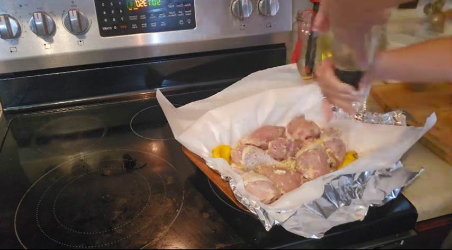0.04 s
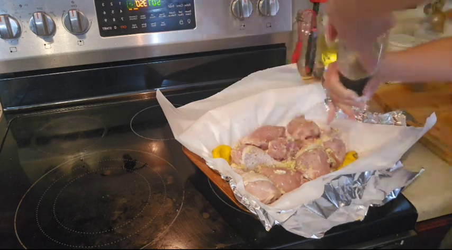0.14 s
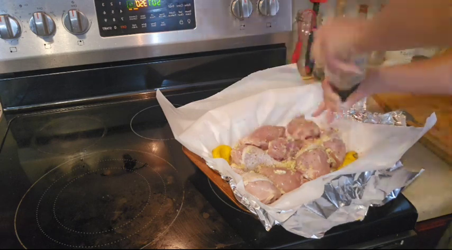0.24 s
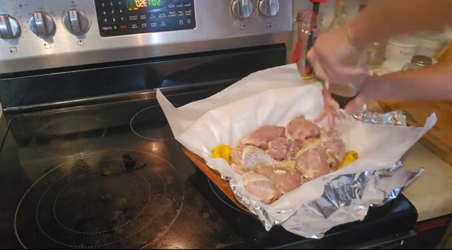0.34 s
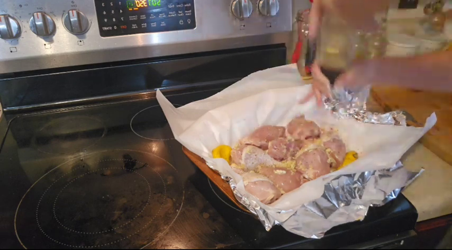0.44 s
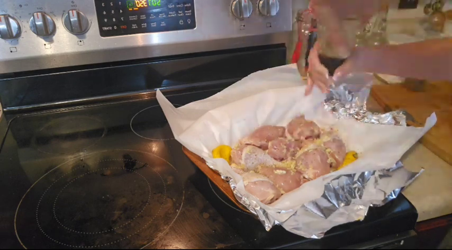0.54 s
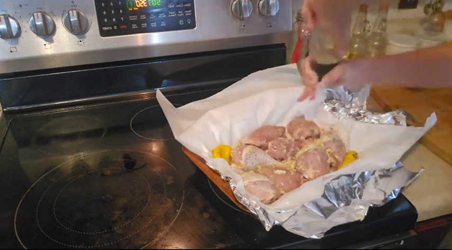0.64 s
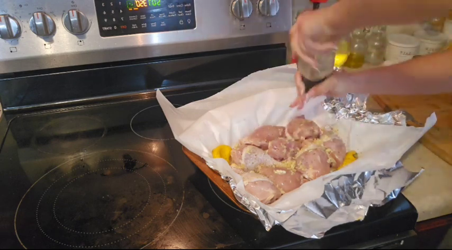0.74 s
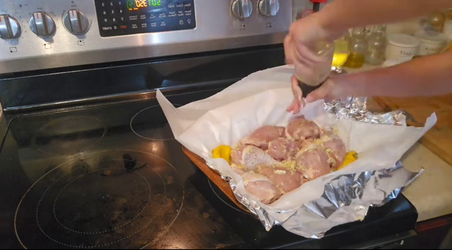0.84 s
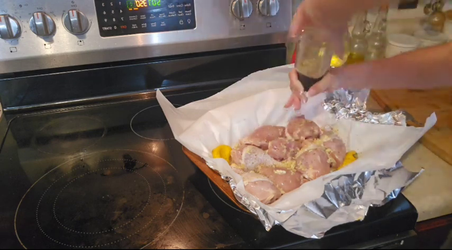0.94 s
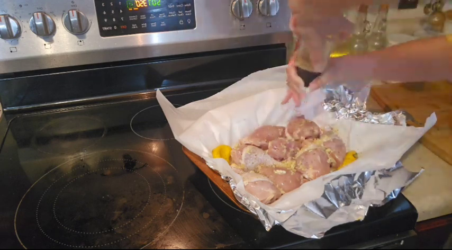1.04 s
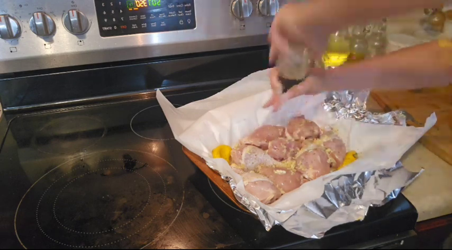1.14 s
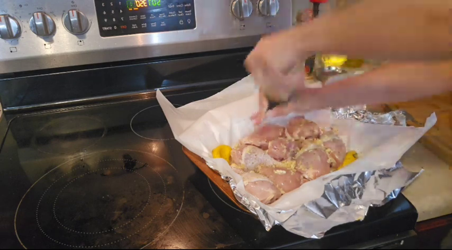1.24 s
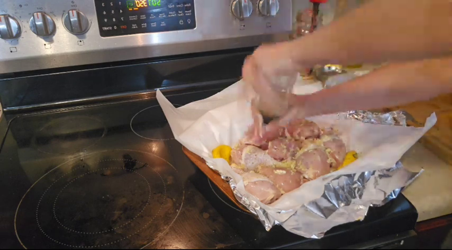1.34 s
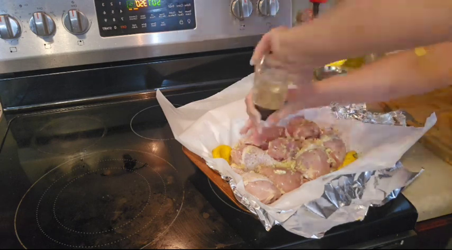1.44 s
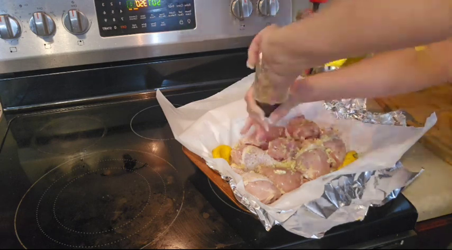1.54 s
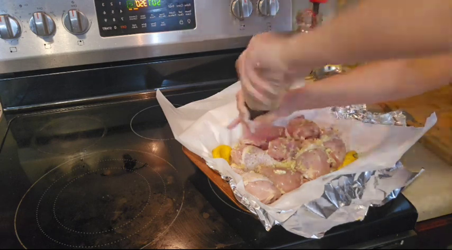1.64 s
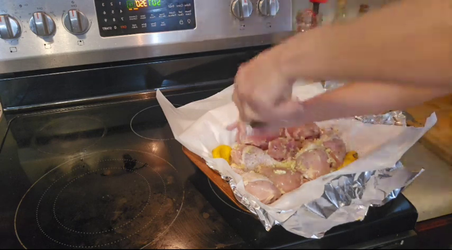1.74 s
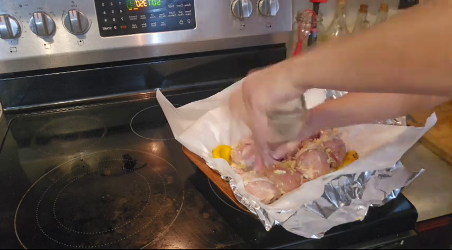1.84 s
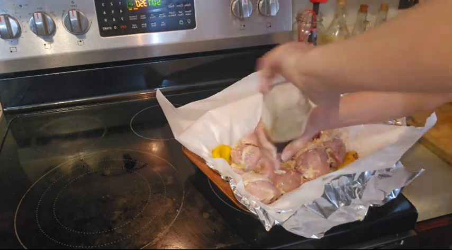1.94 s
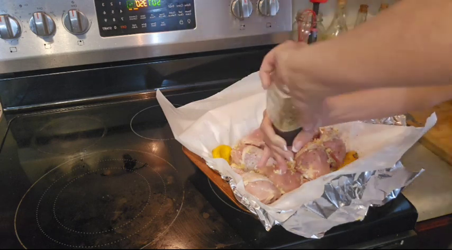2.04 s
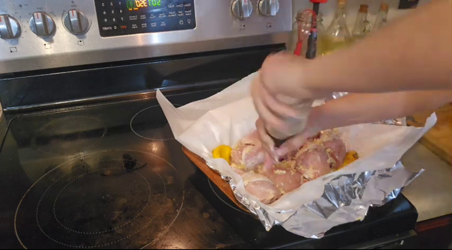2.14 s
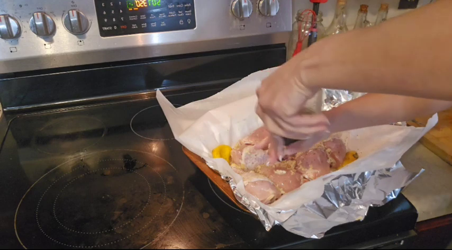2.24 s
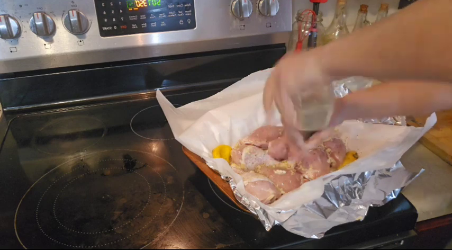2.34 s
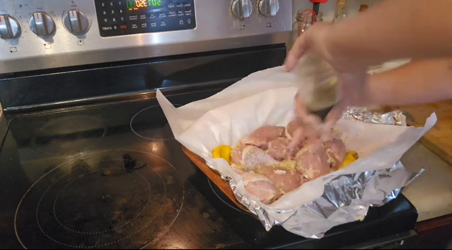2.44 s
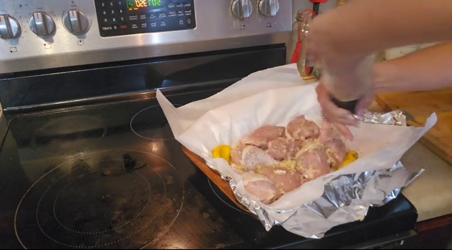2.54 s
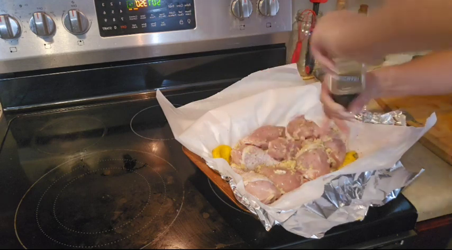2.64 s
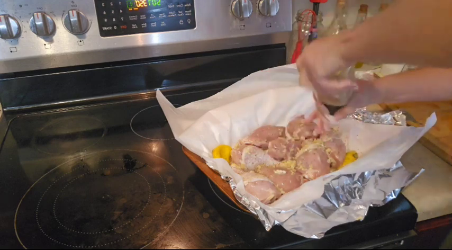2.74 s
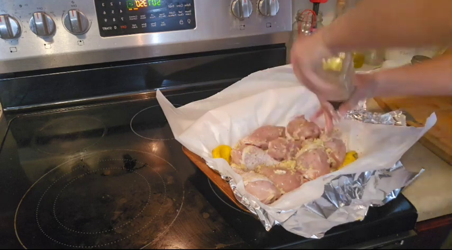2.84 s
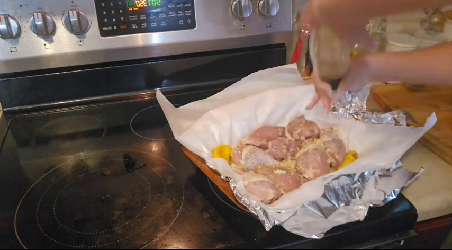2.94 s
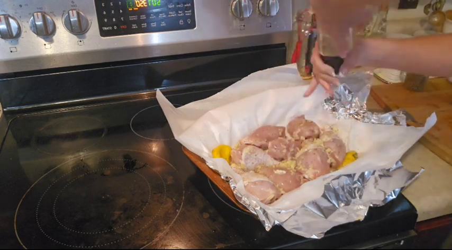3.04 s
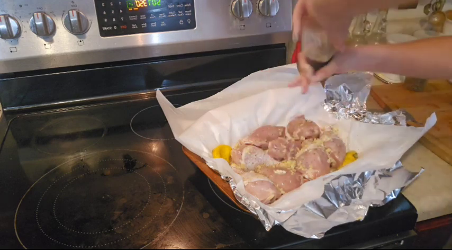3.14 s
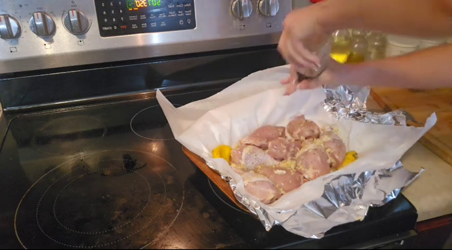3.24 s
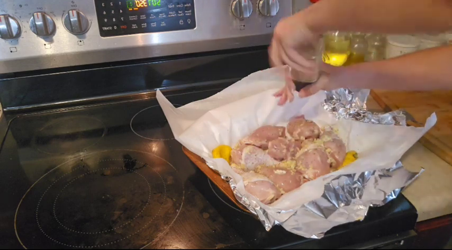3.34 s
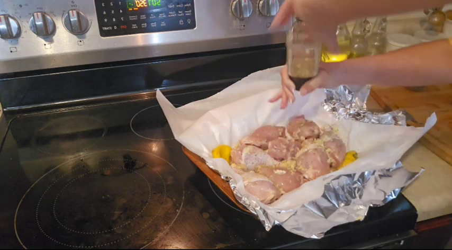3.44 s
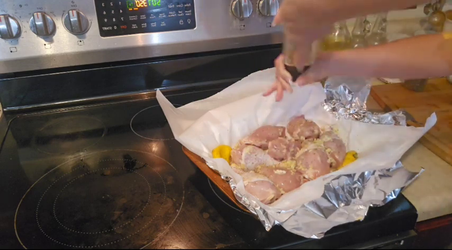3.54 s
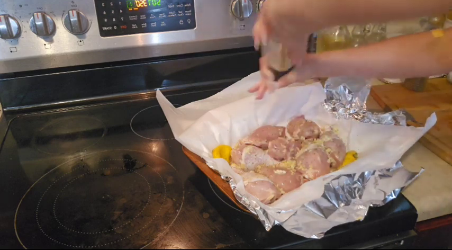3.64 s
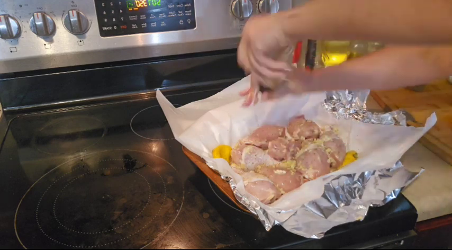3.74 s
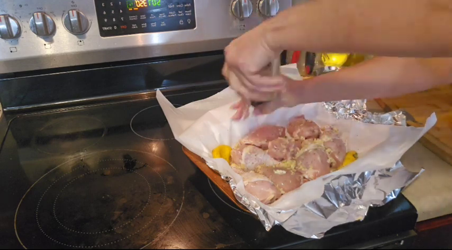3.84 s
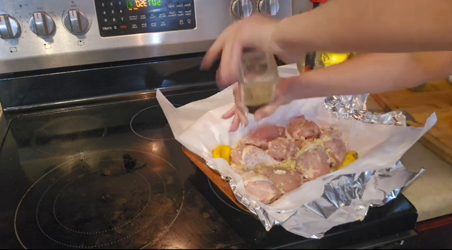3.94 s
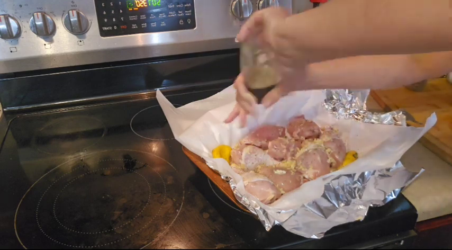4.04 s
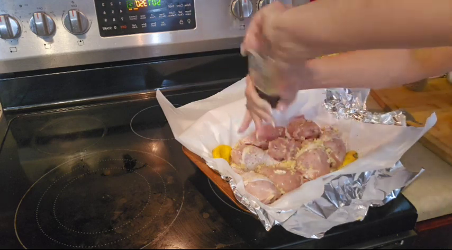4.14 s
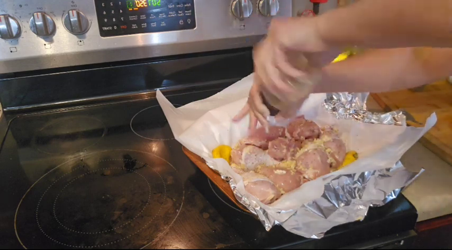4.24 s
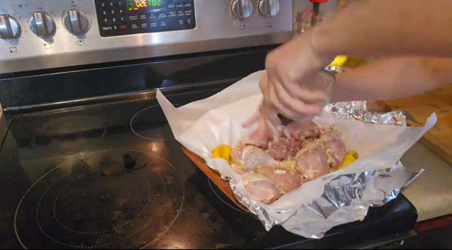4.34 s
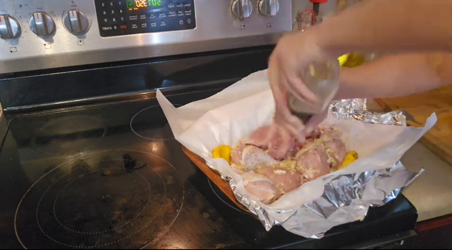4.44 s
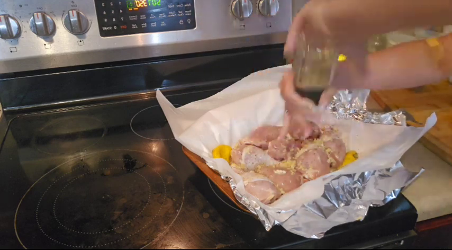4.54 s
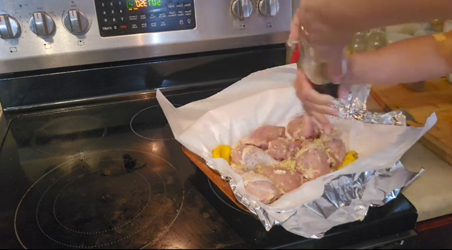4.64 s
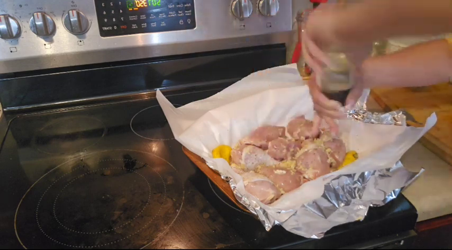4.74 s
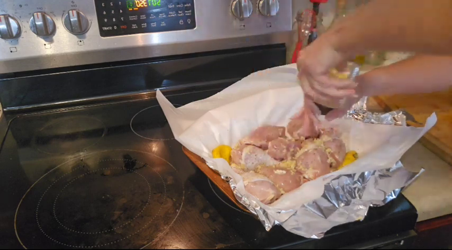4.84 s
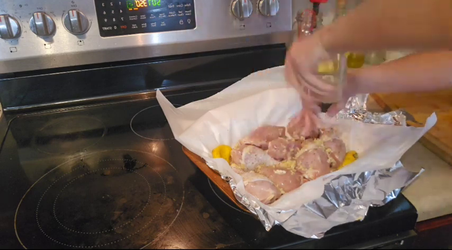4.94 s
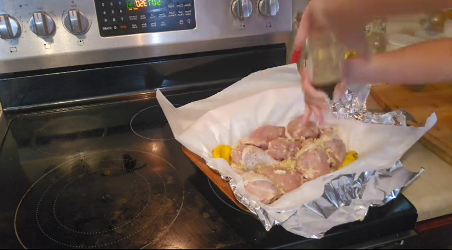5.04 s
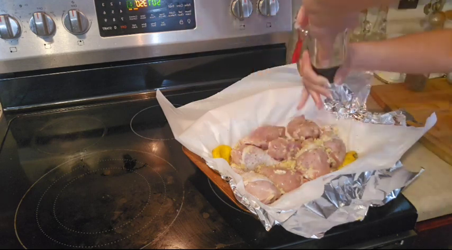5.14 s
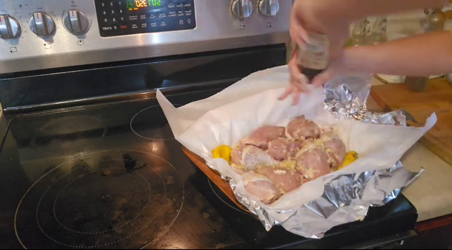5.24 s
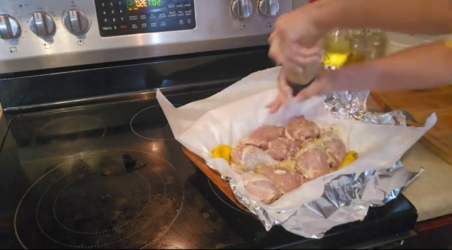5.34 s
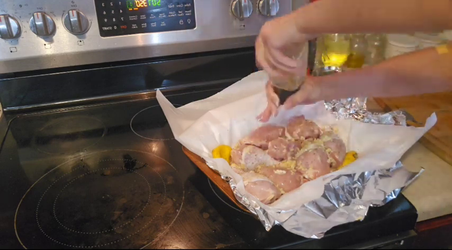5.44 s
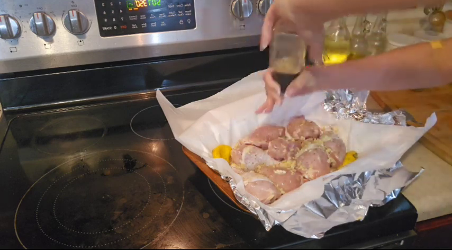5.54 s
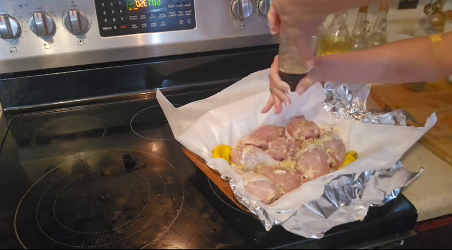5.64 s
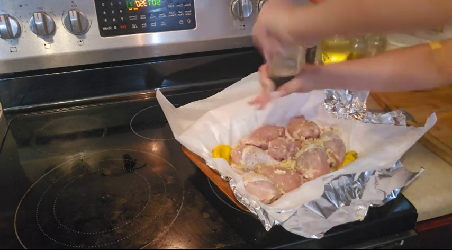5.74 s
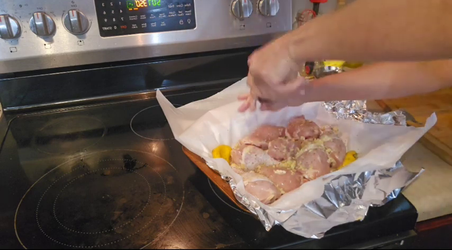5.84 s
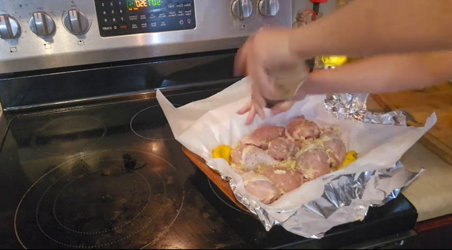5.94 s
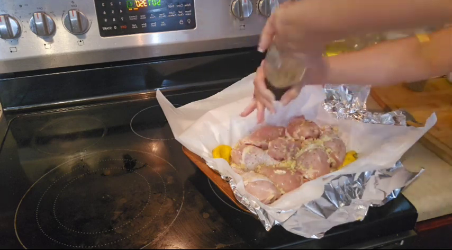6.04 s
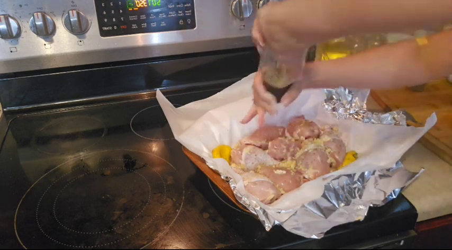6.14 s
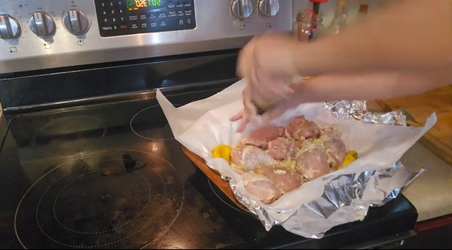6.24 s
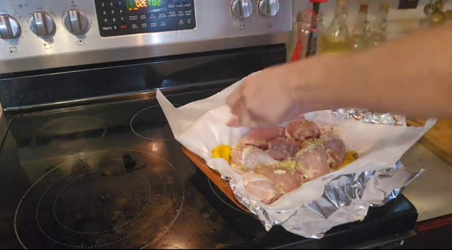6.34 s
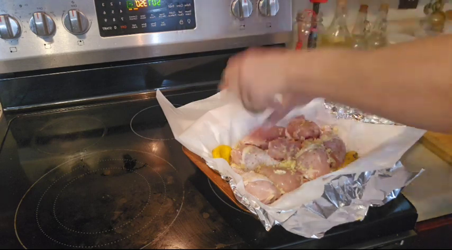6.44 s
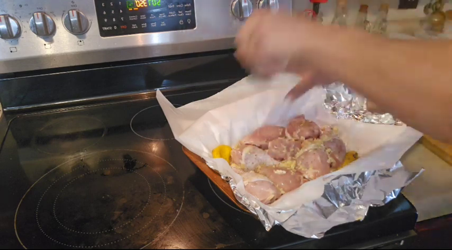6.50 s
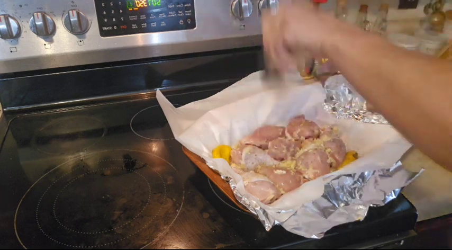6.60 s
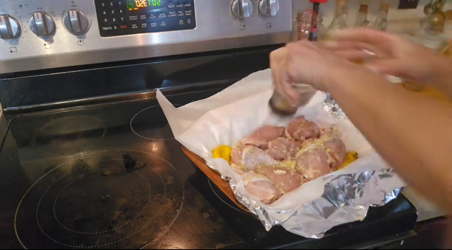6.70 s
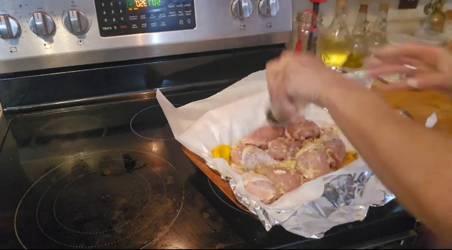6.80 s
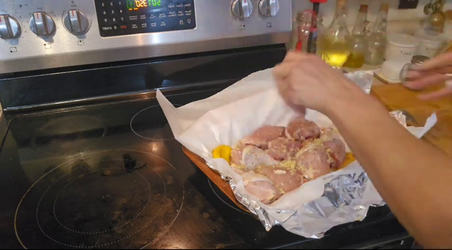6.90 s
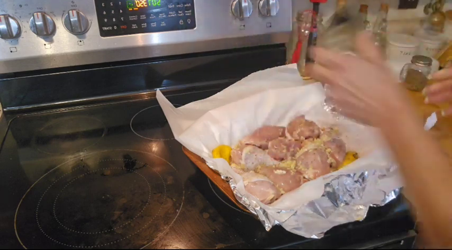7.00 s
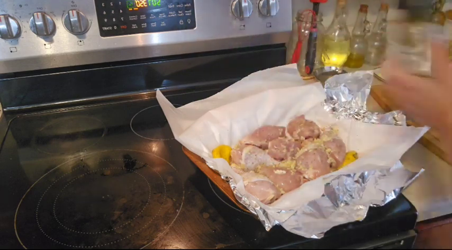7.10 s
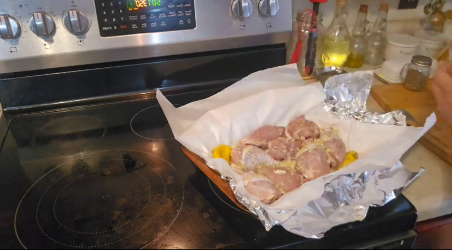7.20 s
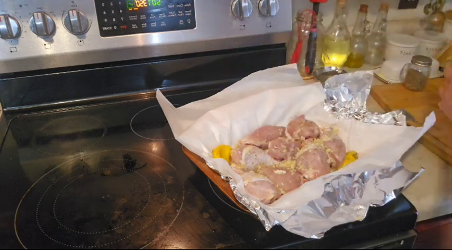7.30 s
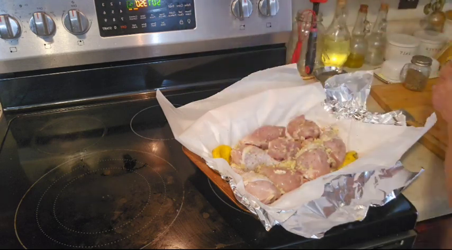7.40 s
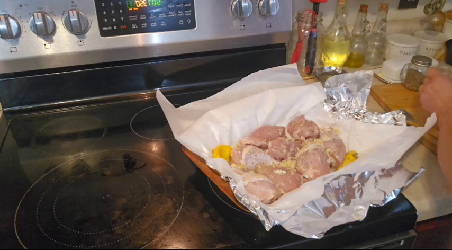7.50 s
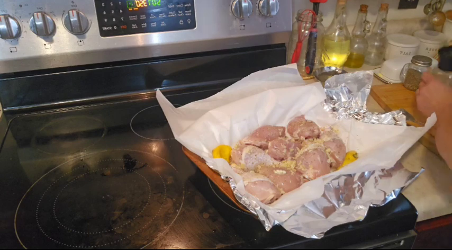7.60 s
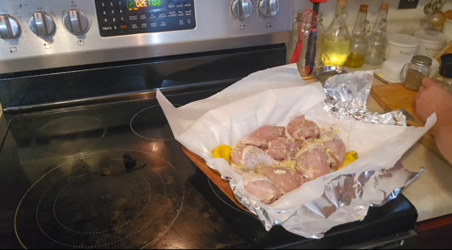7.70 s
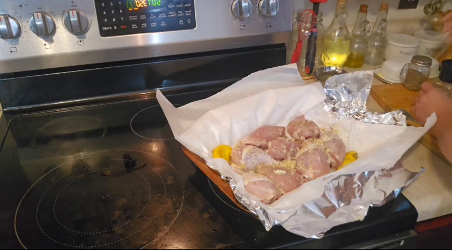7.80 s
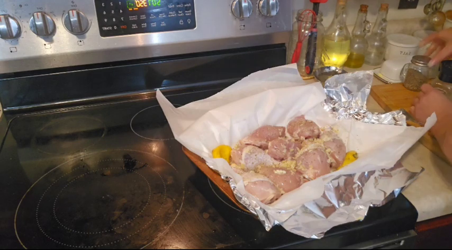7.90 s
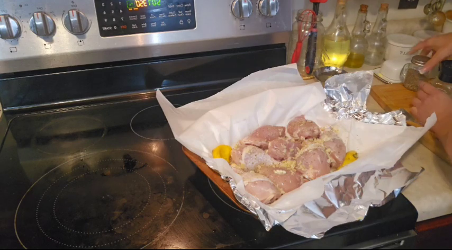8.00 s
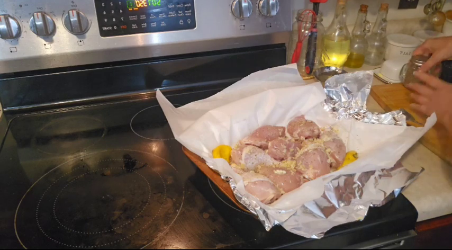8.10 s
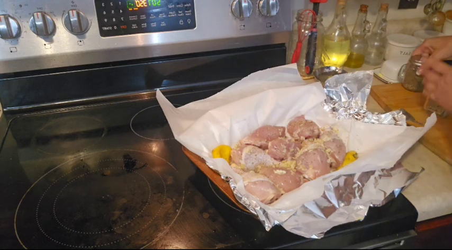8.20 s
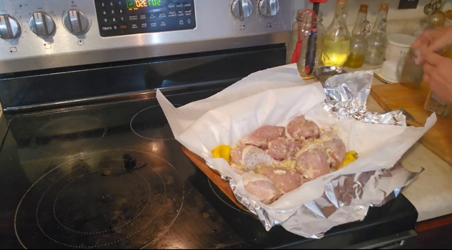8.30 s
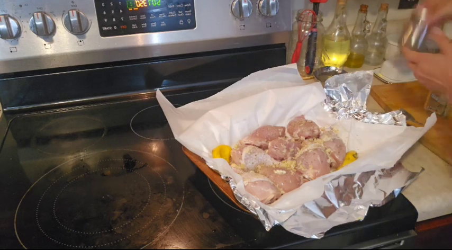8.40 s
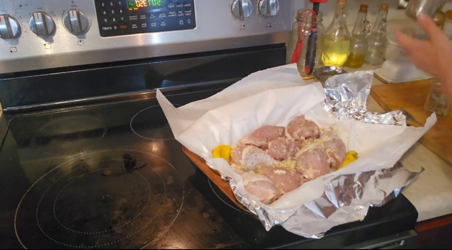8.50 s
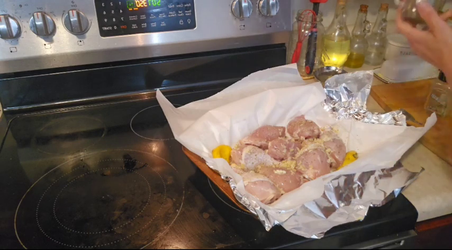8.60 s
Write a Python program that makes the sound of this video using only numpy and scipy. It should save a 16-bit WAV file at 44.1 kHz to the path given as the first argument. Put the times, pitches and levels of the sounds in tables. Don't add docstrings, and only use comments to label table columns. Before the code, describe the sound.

Rhythmic gritty crunches of dried herbs breaking in a jar grinder, with sharp cracks, spitting flakes and light trickling between twists. The grinding ends, hands rustle faintly, and the jar lands on wood with a dull, hollow double knock near eight seconds. Steady low refrigerator hum lies underneath; the nearby stereo microphone catches slight, short room echo.

```python
import sys
import numpy as np
from scipy import signal
from scipy.fft import rfft, irfft, next_fast_len
from scipy.io import wavfile
from scipy.ndimage import uniform_filter1d

SR = 44100
rng = np.random.default_rng(int(sys.argv[2]) if len(sys.argv) > 2 else 0)


def how_loud(loudness_db):
    steps = np.asarray(loudness_db, float) / 20
    return 10 ** steps


def unload_audio(sound):
    columns = np.transpose(np.atleast_2d(sound))
    steps = np.round(np.clip(columns, -1, 1) * 32767)
    wavfile.write(sys.argv[1], SR, steps.astype(np.int16))


N = 381906


def evened(x):
    return x / np.sqrt(np.mean(x ** 2) + 1e-20)


def read(points, hz):
    f, value = np.transpose(points)
    return np.interp(np.log(hz + 1), np.log(f + 1), value)


def coloured(x, points, share=0.99):
    length = x.shape[-1]
    size = next_fast_len(length)
    gain = how_loud(share * read(points, np.fft.rfftfreq(size, 1 / SR)))
    return irfft(rfft(x, size) * gain, size)[..., :length]


def resonate(x, hz, width):
    return signal.lfilter(*signal.iirpeak(hz, hz / max(width, 1), SR), x)


def resonate_twice(x, hz, width):
    return resonate(resonate(x, hz, width), hz, width)


def filtered(x, order, hz, kind):
    return signal.sosfilt(signal.butter(order, hz, kind, fs=SR, output="sos"), x)


def add(mix, s, sound):
    part = mix[..., round(s * SR):][..., :sound.shape[-1]]
    part += sound[..., :part.shape[-1]]


def wander(hz):
    knots = rng.standard_normal(int(N / SR * 60) + 2)
    return np.interp(np.arange(N) / SR * min(hz, 59), np.arange(len(knots)), knots)


def fractures(count):
    breaks_per_s = 1700
    size = how_loud(1.9 * np.minimum(rng.exponential(1, N), 3.5)) * (rng.random(N) < breaks_per_s / SR)
    kind = rng.integers(0, count, N)
    out = np.zeros((2, N))
    for k, hz in enumerate(np.geomspace(2200, 13000, count)):
        paths = rng.standard_normal((2, 200)) * np.exp(-np.arange(200) / 22.5)
        paths[:, 0] += 2.5
        paths = evened(resonate(paths, hz, 0.43 * hz)) * (hz / 6000) ** 0.24
        clump = how_loud(3.24 * wander(40) + 2.0 * wander(9))
        hits = size * clump * (kind == k)
        out += signal.oaconvolve(hits[None], paths, axes=1)[:, :N]
    return evened(out)


def swell(top, hold, db, rise, fall):
    t = np.arange(0, N + 32, 32) / SR - top
    climb, drop = -t / max(rise, 1e-3), (t - hold) / max(fall, 1e-3)
    return how_loud(2 * (db - 20 * np.maximum(np.maximum(climb, drop), 0)))


# (top t/s, hold/s, level/dB, rise/s per 20 dB)
WRIST_SURGES = [(0.0, 0.0063, -48.5, .01), (0.29, 0.064, -67, 1.5), (0.337, 0.063, -39.5, 0.11),
                (0.4, 0.0097, -37, 0), (0.807, 0.068, -41.5, 0.05), (1.237, 0.091, -44.5, -1),
                (1.275, 0.0058, -41.5, -0.27), (1.37, 0.037, -42, -0.25), (1.76, 0.034, -74, -2),
                (1.789, 0.045, -38, 0.07), (2.317, 0.0027, -36.5, -0.01), (2.756, 0.043, -42, -0.15),
                (2.79, 0.00024, -39, -0.12), (2.875, 0, -43.5, 0.05), (3.307, 0.031, -39, 0.04),
                (3.762, 0, -41.5, -0.56), (3.811, 0.012, -43, 0.01), (3.895, 0.0042, -37, 0.13),
                (4.332, 0.009, -43.5, -0.27), (4.418, 0, -37.5, 0.08), (4.857, 0.014, -42.5, 0),
                (4.882, 0, -46, .02), (4.962, .004, -49.5, 0.01), (5.004, 0.0059, -41, 0.24),
                (5.36, 0.034, -42.5, 0.02), (5.4, 0.0041, -37, 0.01), (5.453, 0, -39, -0.01),
                (5.823, 0.046, -54, -0.64), (5.888, 0, -38.5, 0.05), (5.935, 0.0083, -39, 0.08),
                (6.315, 0.036, -49.5, -0.22), (6.344, 0.0074, -40.5, -0.01), (6.406, 0.027, -43, -0.09),
                (6.511, 0.038, -46, 0.08)]
# (top t/s, level/dB, rise/s per 20 dB, fall/s per 20 dB)
GRIP_RUSTLES = [(.68, -62, 0.086, -0.5), (2.08, -73, 0.0055, -0.5), (2.19, -63, .008, -1),
                (2.535, -57, .005, -0.5), (2.72, -66, .4, 0.5), (3.14, -64.5, 0.12, -15),
                (3.74, -83, .1, -5), (4.6, -63.5, .05, 0.5), (4.76, -66, .4, 6), (5.7, -52, .008, 0),
                (6.278, -67, 0.0058, 0), (6.835, -49, 0.11, .1), (7.022, -55.5, 0.33, 0.26),
                (7.38, -53, 0.064, 0.1), (7.53, -61.5, .04, .04), (7.7, -82.5, .08, -2.5),
                (7.93, -78, 0.33, -1), (7.975, -55.5, 0.051, 0.04), (8.659, -62.5, .005, -2.5),
                (7.14, -71.5, .02, 4), (2.261, -43.5, 0.035, 0.16), (8.5, -69.5, .15, 0.2),
                (.18, -66, .01, -5), (5.64, -77, 0.02, 3), (8.292, -59, .004, 0.1), (1.58, -60, .05, .06),
                (7.99, -58, .04, 0.04)]


def effort():
    release_s, trickle_s = 0.092, 0.23
    trickle_db = -16
    bite = sum(swell(*row, release_s) for row in WRIST_SURGES)
    trickle = sum(swell(s, hold, db + trickle_db, rise, trickle_s) for s, hold, db, rise in WRIST_SURGES)
    rustle = sum(swell(s, 0, db, rise, fall) for s, db, rise, fall in GRIP_RUSTLES)
    bright = bite + trickle + rustle
    ring = bite * how_loud(2 * -1.35) + trickle * how_loud(2 * -13) + rustle * how_loud(2 * -8.5)
    airy = rustle * how_loud(2 * -11)
    return [np.interp(np.arange(N) / 32, np.arange(len(p)), np.sqrt(p)) for p in (bright, ring, airy)]


# (f/Hz, level/dB)
BURR_COLOUR = [(700, -13), (1200, -3.5), (1900, -5.5), (2700, 1), (3300, 1.5), (4000, 1.5), (5000, -7),
               (6300, -6.5), (7800, -10), (9000, -12), (10500, -10), (12000, -7.5), (14000, -7),
               (16000, -30)]
# (f/Hz, width/Hz, level/dB)
JAR_HOLLOW = [(2160, 300, -1), (2750, 250, 2), (3300, 400, -1)]
# (f/Hz, width/Hz, level/dB)
GLASS_WALL = [(5470, 620, -16.5), (6250, 210, -14), (7540, 600, -9.5), (8800, 520, -16)]


def crunch():
    bright, ring, airy = effort()
    grains = fractures(count=10) + .55 * rng.standard_normal((2, N))
    grains = coloured(grains * how_loud(1.1 * wander(55)), BURR_COLOUR)
    low = evened(filtered(grains, 2, 3400, "low"))
    high = evened(filtered(grains, 2, 3400, "high"))
    wall = sum(how_loud(db) * evened(resonate(high, f, width)) for f, width, db in GLASS_WALL)
    high = evened(high + wall)
    jar = sum(how_loud(db + 1.5 * wander(8)) * evened(resonate(low, f, width)) for f, width, db in JAR_HOLLOW)
    hollow = evened(low + .2 * jar)
    top = resonate_twice(high, 13000, 5000)
    left, right = how_loud(-2.5) * (bright * high + ring * hollow + airy * top)
    return np.array([np.roll(left, 2), right])


# (t/s, peak level/dB, ring f/Hz)
GRAIN_CRACKS = [(0.3381, -28, 3840), (0.8057, -33, 2380), (1.224, -36, 4050), (1.247, -33, 2870),
                (1.32, -27, 2970), (1.3382, -28.5, 3170), (1.77, -29.5, 2770), (1.9757, -34.5, 3500),
                (2.0776, -30.5, 4670), (2.238, -38, 3630), (2.269, -28.5, 2780), (2.309, -26, 2980),
                (2.8749, -29, 3070), (1.372, -41, 3330), (4.3127, -43, 3520), (4.337, -39, 3070),
                (4.3768, -36, 2660), (4.425, -20, 3000), (4.587, -31, 3470), (4.665, -45, 4230),
                (4.892, -33, 2670), (5.156, -37.5, 3500), (5.827, -38, 2760), (5.8895, -41, 2730),
                (5.936, -33, 2830), (6.069, -41.5, 3650), (6.321, -37, 2240), (6.343, -30.5, 4230),
                (6.3917, -35, 2680), (8.2908, -37.5, 2060)]
# (t/s, peak level/dB, ring f/Hz)
LEAF_SNAPS = [(0.2387, -33.5, 6240), (0.3116, -39, 5630), (0.771, -37, 6300), (0.8067, -24.5, 7000),
              (1.286, -29.5, 7160), (1.7296, -24.5, 7060), (2.743, -37.5, 7300), (2.7685, -33, 6090),
              (2.9208, -39, 6170), (3.234, -39, 5700), (3.255, -32.5, 5900), (3.271, -24, 7000),
              (3.299, -34, 7300), (3.767, -28.5, 7100), (3.8915, -29, 8050), (4.374, -33, 7380),
              (4.833, -36, 6100), (4.8568, -29, 7200), (5.014, -22.5, 5800), (5.351, -33.5, 6240),
              (5.36, -35, 6050), (5.3787, -28.5, 7300), (5.4027, -18.5, 7540), (5.447, -32, 6600),
              (6.495, -40, 6650), (1.398, -20, 7260), (1.406, -33, 5650), (4.426, -23.5, 4360),
              (4.431, -43, 5200)]
# (t/s, peak level/dB, ring f/Hz)
STEM_TICKS = [(0.627, -43, 5670), (1.9935, -27, 6650), (2.1878, -32, 5560), (2.502, -44, 6410),
              (2.5326, -33.5, 6400), (2.66, -41.5, 5800), (3.4425, -30.5, 7160), (3.522, -41.5, 3450),
              (4.6114, -31, 5800), (4.733, -36, 5420), (4.765, -32.5, 6850), (5.108, -29.5, 5630),
              (5.701, -39.5, 6350), (6.107, -33.5, 6600), (6.277, -45, 5500), (7.978, -44, 5460)]
# (t/s, peak level/dB, ring f/Hz)
GLASS_KNOCKS = [(1.395, -16.5, 3200), (3.0814, -33.5, 2240), (3.082, -36.5, 1350), (3.542, -47, 6230),
                (3.629, -36, 2860), (7.9988, -26, 1920)]
# (top level against ring/dB, spray level/dB, dull above f/Hz)
SHARPNESS = [
    (-19.5, -4, 13000),
    (-17, 0, 14200),
    (-16, -5.5, 13600),
    (-49, -3.5, 8100),
]


def cracks():
    kinds = (GRAIN_CRACKS, LEAF_SNAPS, STEM_TICKS, GLASS_KNOCKS)
    rows = [(*row, *edge) for kind, edge in zip(kinds, SHARPNESS) for row in kind]
    out, t = np.zeros((2, N)), np.arange(1500) / SR
    puffs = rng.standard_normal((len(rows), 5, 1500))
    for (s, db, hz, top_db, spray_db, dull_hz), puff in zip(rows, puffs):
        burst = (puff[0] + 0.24 * puff[1:3]) * np.exp(-t / 0.00049)
        spray_shape = np.exp(-t / 0.012) * (1 - np.exp(-t / 0.00057))
        burst += how_loud(spray_db - 0.44 * (db + 38.0)) * puff[3:] * spray_shape
        burst = filtered(burst, 4, dull_hz, "low")
        ring = resonate(burst, hz, .3 * hz)
        wide = resonate(resonate_twice(burst, 5000, 8000), 1.3 * hz, 3 * hz)
        top = resonate_twice(burst, 12000, 6000)
        snap = ring / abs(ring).max() + .5 * wide / abs(wide).max()
        snap += how_loud(top_db + 7.5) * top / abs(top).max()
        add(out, s - .0002, how_loud(db - 5.5) * snap)
    return out


def scraped(rows, width, t60):
    out, t = np.zeros((2, N)), np.arange(4000) / SR
    scrapes = rng.standard_normal((len(rows), 3, 4000))
    for (s, length, db, hz), scrape in zip(rows, scrapes):
        rub = 0.77 * scrape[0] + scrape[1:]
        tone = resonate(resonate(rub, hz, width * hz), hz, 2 * width * hz)
        tone = tone[:, ::-1]
        shape = np.minimum(t / 0.00079, 1) * how_loud(-60 * np.maximum(t - length, 0) / t60)
        held = round(max(length, .003) * SR)
        add(out, s, how_loud(db - 0.5) * shape * tone / np.sqrt(np.mean(tone[:, :held] ** 2)))
    return out


# (start t/s, length/s, level/dB, f/Hz)
GLASS_NOTES = [(0.408, 0.019, -48, 7850), (0.803, 0.009, -61, 8100), (0.866, 0.01, -53, 7450),
               (1.323, 0.009, -49, 2970), (1.39, 0.013, -47, 8700), (1.729, 0.009, -56, 6130),
               (1.792, 0.023, -57, 5470), (1.789, 0.024, -50, 2690), (1.8, 0.009, -46, 4440),
               (1.824, 0.013, -53, 5230), (1.824, .01, -52, 2190), (2.264, 0.013, -53, 2710),
               (2.307, 0.022, -50, 8300), (2.318, 0.01, -52, 6200), (2.318, 0.013, -49, 7600),
               (2.874, 0.009, -48, 8630), (3.294, 0.033, -57, 7200), (3.878, 0.022, -52, 2850),
               (3.887, 0.033, -57, 7430), (4.407, 0.009, -53.5, 8060), (4.855, 0.009, -48, 7530),
               (4.884, 0.011, -53, 2670), (5.36, 0.011, -53, 5990), (5.399, 0.01, -59, 5390),
               (5.405, 0.009, -48, 5990), (5.403, 0.013, -43, 7840), (5.442, 0.019, -50, 7370),
               (5.444, 0.014, -46.5, 2960), (5.446, 0.016, -51, 6510), (5.888, 0.016, -51, 2800),
               (5.94, 0.01, -41, 2740), (5.942, 0.013, -51, 7800), (6.336, 0.042, -53, 2700),
               (6.345, 0.018, -46, 2180), (6.352, 0.0093, -51, 7860), (6.357, 0.014, -51, 8600),
               (6.387, 0.016, -52, 2730), (6.394, 0.009, -53, 2120), (6.76, .02, -67, 7650),
               (6.77, .012, -69.5, 8750), (6.84, 0.024, -63.5, 8750), (6.84, .03, -64, 12200),
               (4.95, .014, -52, 2750), (7.025, .015, -66, 7700), (7.37, .03, -66, 12200),
               (6.278, 0.0065, -66, 8500), (8.03, 0.025, -38.5, 270.4)]


def singing_glass():
    return scraped(GLASS_NOTES, width=0.02, t60=0.034)


# (start t/s, length/s,
# level/dB, centre f/Hz)
LOOSE_FLAKES = [(.421, .006, -49, 12000), (.642, .006, -57, 3300), (.644, .005, -56, 5600),
                (.786, .005, -55, 7800), (.89, .005, -48, 5600), (1.264, .005, -51, 5600),
                (1.378, .006, -53, 12000), (1.567, .005, -60, 7760), (1.742, .005, -51, 3000),
                (1.774, .005, -47, 7800), (2.193, .005, -58, 8700), (2.309, .004, -42, 7800),
                (2.309, 0.004, -47, 3020), (2.309, .004, -47, 12000), (2.324, .006, -47, 12000),
                (2.494, .005, -60, 3200), (2.784, .005, -49, 5630), (2.798, .005, -47.5, 7800),
                (2.838, .005, -57, 5600), (3.083, .005, -59, 4500), (3.094, .004, -60.5, 6000),
                (3.112, .008, -58, 5800), (3.217, .008, -59, 5500), (3.313, .005, -54, 5600),
                (3.314, 0.0069, -52, 12500), (3.355, .005, -50, 7800), (3.541, .004, -60, 7200),
                (3.866, .007, -52.5, 2800), (1.395, 0.0027, -49, 1200), (4.641, .005, -55.5, 6200),
                (4.706, .005, -58, 5600), (4.844, 0.0044, -59, 3000), (4.892, .005, -51, 7800),
                (5.017, .006, -49.5, 12500), (5.114, 0.0046, -54, 3300), (5.408, .007, -45, 12500),
                (5.635, .005, -61, 3000), (5.851, .005, -54, 3000), (5.891, .006, -47, 8000),
                (5.891, .006, -50, 12000), (5.946, .007, -48, 12000), (6.071, .005, -56, 7500),
                (6.073, 0.0042, -56.5, 5500), (6.359, .006, -50, 12000), (7.014, .005, -60, 2960),
                (7.134, .005, -61.5, 4200), (7.517, .005, -61, 6500), (7.54, .005, -60, 7000),
                (7.984, 0.0071, -49.5, 600), (7.997, .008, -50, 5900)]


def flakes():
    return scraped(LOOSE_FLAKES, width=0.2, t60=0.04)


# (start t/s, end t/s, f/Hz, level/dB)
CAP_SQUEAKS = [
    (2.16, 2.244, 5600, -62),
    (6.737, 6.79, 5600, -71),
    (6.792, 6.918, 5590, -65),
    (6.97, 7.083, 5560, -67),
    (7.274, 7.327, 5600, -73),
    (7.348, 7.405, 5600, -62),
    (3.994, 4.264, 296, -61),
]


def squeaks():
    out = np.zeros(N)
    for start, end, hz, db in CAP_SQUEAKS:
        grit, size = rng.standard_normal(SR), round((end - start) * SR)
        rub = resonate(grit, hz, hz / 60)[-size:]
        slips = evened(resonate(grit, 45, 60))[-2 * size:-size]
        whistle = evened(rub * how_loud(1.5 * slips))
        add(out, start, whistle * how_loud(db) * signal.windows.tukey(size, .5))
    return out


# (f/Hz, level/dB, time to fade 60 dB/s)
BOARD_MODES = [(58.6, -6.5, 0.34), (113, -20.5, 0.094), (204, -4, 0.12), (263.7, -9.5, 0.45),
               (311, -8.5, 0.11), (361, -2, 0.071), (570, -14, .07), (662, -13, 0.12), (873, -10, 0.12),
               (1133, -4.5, 0.11), (1830, -7.5, 0.11), (2280, -11, .09)]
# (t/s, level/dB, softness/s)
BASE_BLOWS = [
    (7.9935, -10.5, 0.00083),
    (7.9977, -14.5, 0.0013),
    (8.0049, -25.5, 0.0017),
    (8.0157, -19, 0.0013),
]
# (f/Hz, level/dB)
COUNTER_RATTLE = [(120, -3), (250, 9), (450, 2), (750, 3), (1200, 6), (1500, -6), (2200, -4.5), (3000, -17),
                  (6000, -18), (9000, -46)]
# (f/Hz, level/dB)
COUNTER_HOLLOW = [(120, -6), (300, 9.5), (750, 7.5), (1100, -2), (1500, -8.5), (2000, -3), (2500, -19),
                  (3000, -13.5), (6000, -21), (9000, -52)]


def set_down():
    t, push = np.arange(SR // 2) / SR, np.zeros(N)
    board = np.zeros(len(t))
    for hz, db, t60 in BOARD_MODES:
        late = np.minimum(t * hz / 1.1, 1)
        board += how_loud(db - 60 * t / t60) * np.sin(2 * np.pi * hz * t) * late
    shared, *apart = rng.standard_normal((3, len(t)))
    shaken = shared + 1.6 * np.array(apart)
    rattle = evened(coloured(shaken, COUNTER_RATTLE)) * how_loud(-60 * t / 0.13)
    rattle += evened(coloured(shaken[:, ::-1], COUNTER_HOLLOW)) * how_loud(-9.5 - 60 * t / 1.11)
    for k, (s, db, soft) in enumerate(BASE_BLOWS):
        blow = signal.windows.hann(round(soft * SR) + 3) / (soft * SR / 2)
        add(push, s, -(-1) ** k * how_loud(db) * blow)
    knock = how_loud(25.5) * resonate(resonate(push, 680, 610), 700, 1200)
    wood = np.roll(signal.oaconvolve(push, board)[:N], round(0.00143 * SR))
    out = np.tile(knock + how_loud(-9.5) * wood, (2, 1))
    add(out, BASE_BLOWS[0][0], how_loud(-28.5) * rattle * (1 - np.exp(-(t / 0.0012) ** 2)))
    return out * how_loud(np.array([[-.4], [.4]]))


# (f/Hz, time to fade 60 dB/s)
ROOM_FADE = [(100, 0.22), (400, 0.33), (1500, 0.46), (5000, 0.7), (12000, 0.42)]


def kitchen(x):
    taps = np.zeros((2, SR // 2))
    at = np.arange(120, SR // 2 - 20, 20)
    at = at + rng.integers(0, 20, (2, len(at)))
    np.put_along_axis(taps, at, rng.choice([-1., 1.], at.shape), 1)
    hz, t, z = signal.stft(taps, SR, nperseg=256)
    fade = how_loud(-60 * t / read(ROOM_FADE, hz)[:, None])
    tail = signal.istft(z * fade, SR, nperseg=256)[1]
    return signal.fftconvolve(x, tail / np.linalg.norm(tail[0]), axes=1)[:, :N]


# (f/Hz, rms level/dB)
COMPRESSOR_TONES = [(239.3, -65.5), (65.4, -83), (617, -73.5), (729, -79), (847, -78.5)]
# (t/s, change of level/dB)
HUM_SHADE = [(.05, 2), (.26, -4), (.5, -2.5), (.93, -5.5), (1.23, -4), (1.47, -5.5), (1.92, -4), (2.27, -2),
             (2.51, -2), (2.94, -4), (3.25, -2.5), (3.42, -6), (3.82, -2.5), (3.98, -3), (4.53, -5),
             (4.8, -5), (5.14, -6), (5.52, -1.5), (5.84, -2.5), (6.03, -2), (6.46, -4), (6.59, -4),
             (6.87, -4), (8.03, 5.5), (8.34, -1)]


def fridge():
    t, out = np.arange(N) / SR, np.zeros(N)
    for f, db in COMPRESSOR_TONES:
        out += how_loud(db) * np.sqrt(2) * np.sin(2 * np.pi * (f * t + rng.random()))
    dip_s = 0.043
    shade_db = sum(np.interp(t, [s - dip_s, s, s + dip_s], [0, db, 0]) for s, db in HUM_SHADE)
    return out + how_loud(-41 + shade_db) * np.sqrt(2) * np.sin(2 * np.pi * 120 * t)


# (f/Hz, level/dB)
AIR_COLOUR = [(15, -37), (35, -8), (70, -10.5), (140, -8.5), (250, -11), (330, -17.5), (650, -22.5),
              (1000, -26.5), (1400, -25), (2300, -26.5), (2900, -32), (6500, -35.5), (8800, -54),
              (11000, -52.5)]
# (f/Hz, width/Hz, rms level/dB)
FAN_DRONES = [(42.4, 44, -55), (91, 67, -61.5), (209.7, 10.6, -73), (515, 17, -78), (600, 175, -78),
              (659, 16, -77.5), (359, 16, -75.5), (731.3, 12, -80), (860, 14, -75.5), (1235, 61, -73.5),
              (1342, 75, -74), (1871, 44, -73.5)]
# (f/Hz, likeness 0 to 1)
LIKENESS = [(30, 0.9), (150, 0.91), (400, 0.71), (1000, 0.34), (2500, 0.034), (6000, 0.04)]


def air():
    hz = np.fft.rfftfreq(N, 1 / SR)
    a, b, c, d = rng.standard_normal((4, len(hz)))
    same = np.clip(read(LIKENESS, hz), 0, 1)
    left = a + 1j * b
    right = same * left + np.sqrt(1 - same ** 2) * (c + 1j * d)
    pair = irfft(np.array([left, right]), N)
    out = how_loud(-52 + 1.7 * wander(4)) * evened(coloured(pair, AIR_COLOUR))
    for f, width, db in FAN_DRONES:
        out += how_loud(db) * evened(resonate_twice(pair, f, width))
    return out


def scene():
    mill = crunch() + squeaks() + cracks()
    jar = set_down()
    echo = how_loud(-8.0) * kitchen(mill) + how_loud(-11.5) * kitchen(jar)
    return mill + jar + echo + singing_glass() + flakes() + fridge() + air()


# (f/Hz, left minus right level/dB)
PORT_COLOUR = [(60, 3), (250, 0), (700, 0.5), (2000, 0.5), (4000, 0), (5600, -3.5), (6800, -2.5),
               (8000, 9.5), (9500, 2.5), (11500, 6), (14000, -1.5)]


def at_ports(dry):
    left = coloured(dry[0], PORT_COLOUR, share=.5)
    right = coloured(dry[1], PORT_COLOUR, share=-.5)
    return np.array([left, right])


# (f/Hz, level/dB)
FAINTEST = [(1500, -132), (8500, -120), (9300, -98), (11000, -96.5), (14500, -98)]


def gated(x):
    hz, t, z = signal.stft(x, SR, "cosine", nperseg=2048)
    bands = (abs(z[:, :1024]) ** 2).reshape(2, 64, 16, -1).mean(2)
    waver = rng.exponential(1, bands.shape[1:]) - 1
    limit_db = read(FAINTEST, hz[8:1024:16])[:, None] + 6 * uniform_filter1d(waver, size=2, axis=1)
    z[:, :1024] *= np.repeat(10 * np.log10(bands + 1e-20) > limit_db, 16, axis=1)
    return signal.istft(z, SR, "cosine", nperseg=2048)[1][:, :N]


def top_cut(x):
    return signal.sosfilt(signal.butter(12, 15870, fs=SR, output="sos"), x)


def record(dry):
    edge = signal.firwin(numtaps=401, cutoff=14750, window=("kaiser", 5), fs=SR)
    ports = signal.oaconvolve(at_ports(dry), edge[None], "same")
    mix = gated(ports)
    return top_cut(mix)


dry = scene()
out = record(dry)
unload_audio(out)
```